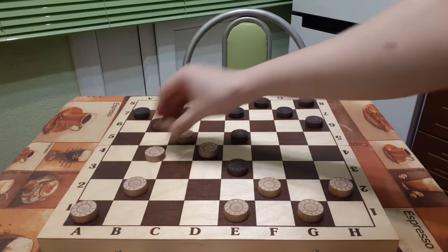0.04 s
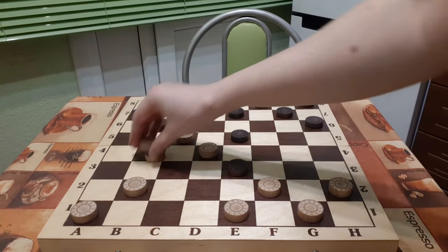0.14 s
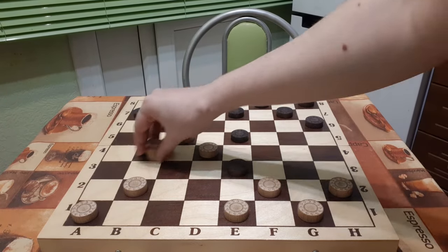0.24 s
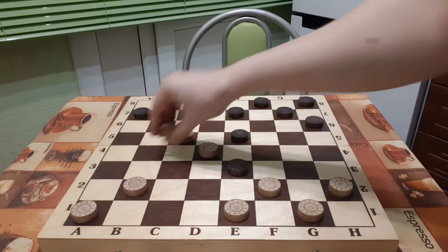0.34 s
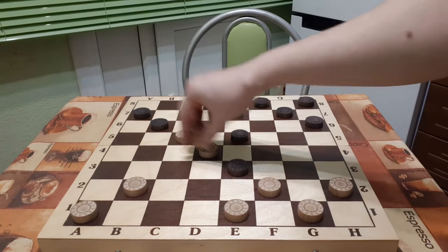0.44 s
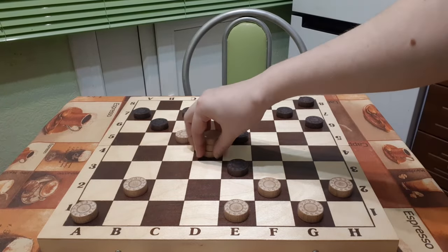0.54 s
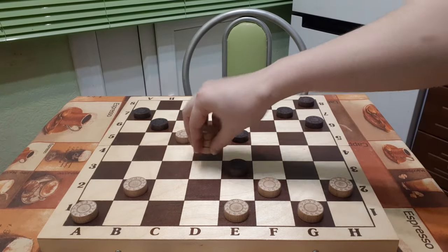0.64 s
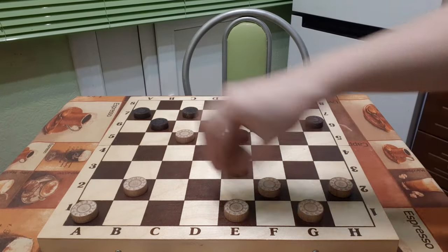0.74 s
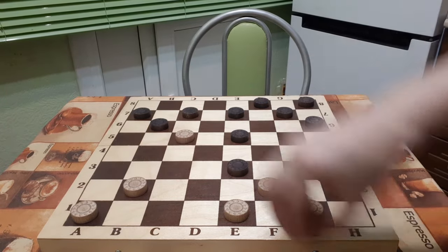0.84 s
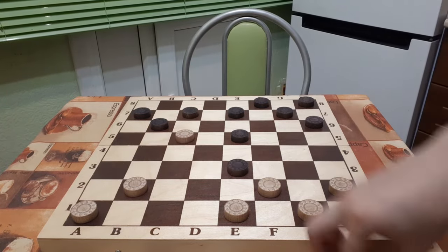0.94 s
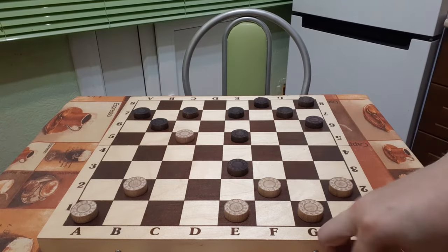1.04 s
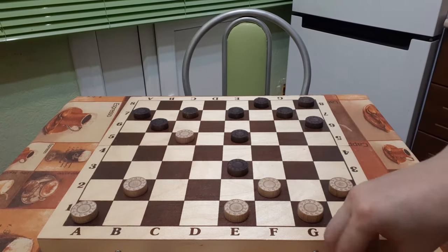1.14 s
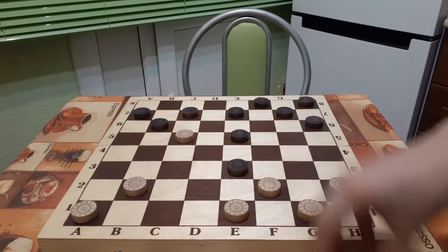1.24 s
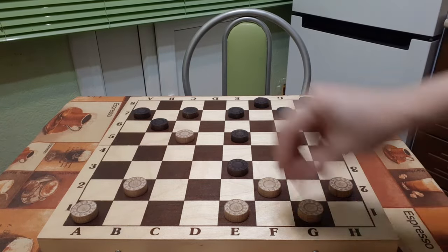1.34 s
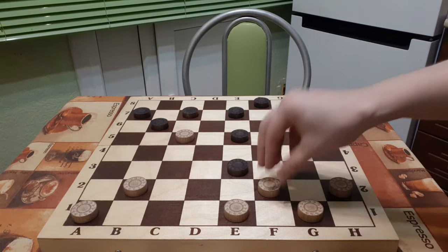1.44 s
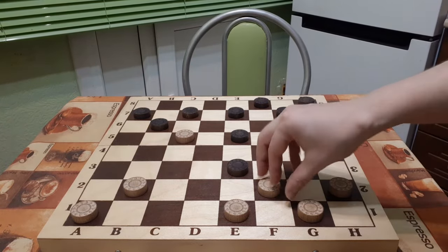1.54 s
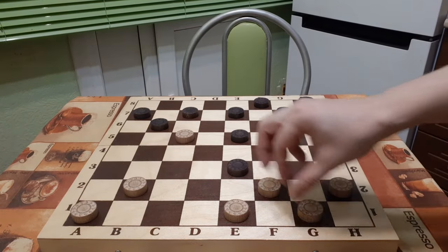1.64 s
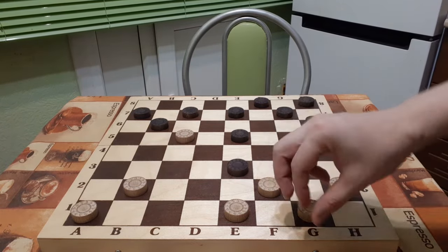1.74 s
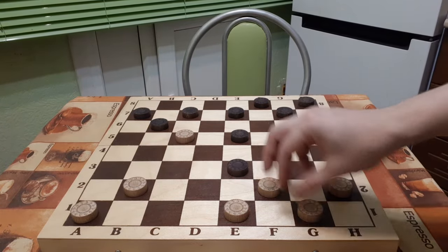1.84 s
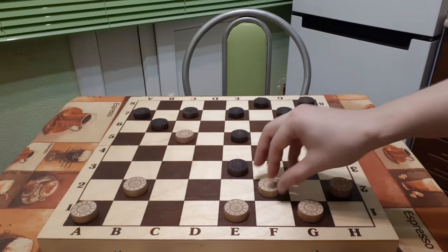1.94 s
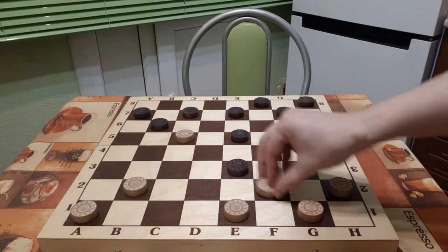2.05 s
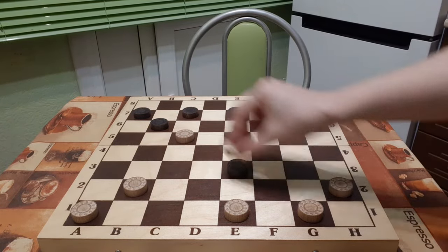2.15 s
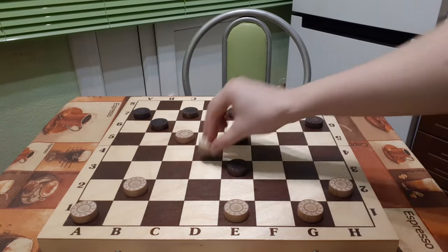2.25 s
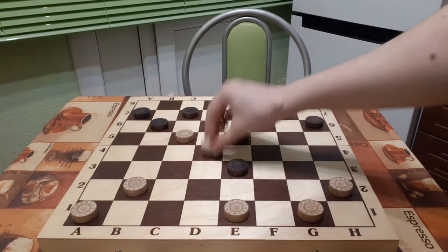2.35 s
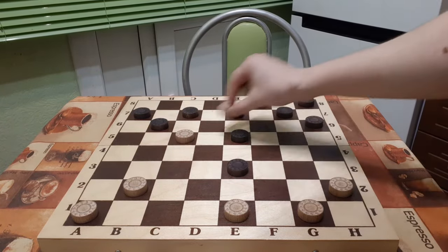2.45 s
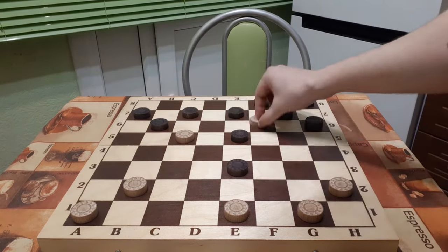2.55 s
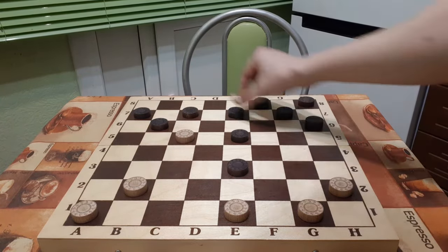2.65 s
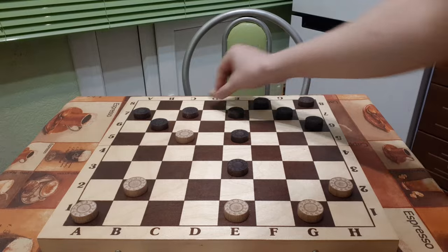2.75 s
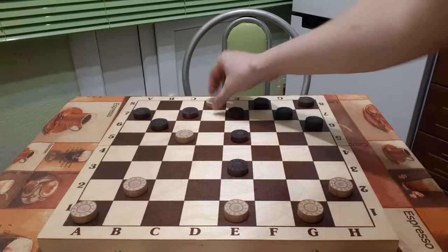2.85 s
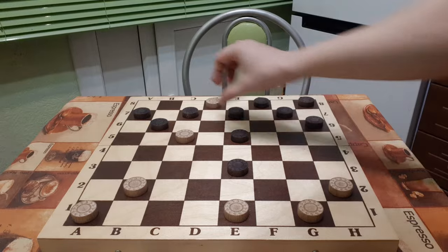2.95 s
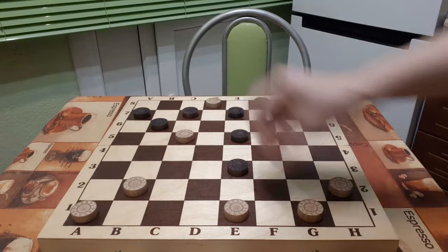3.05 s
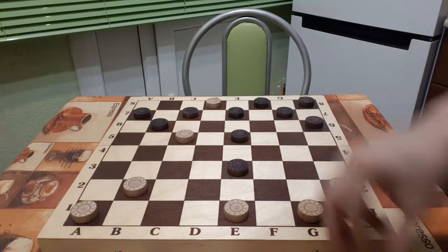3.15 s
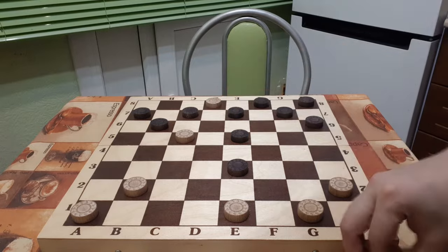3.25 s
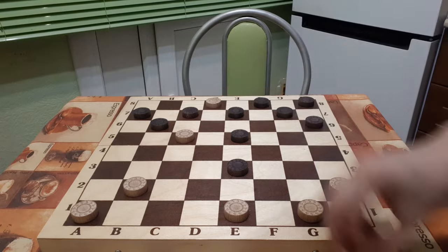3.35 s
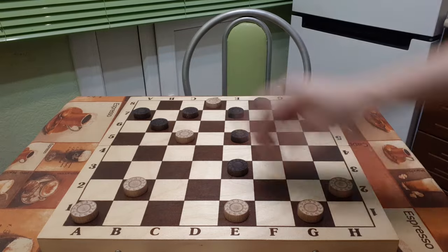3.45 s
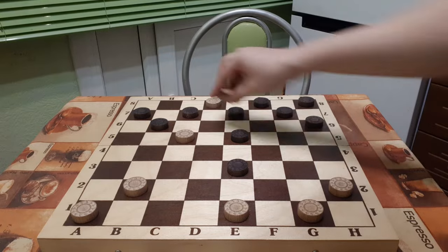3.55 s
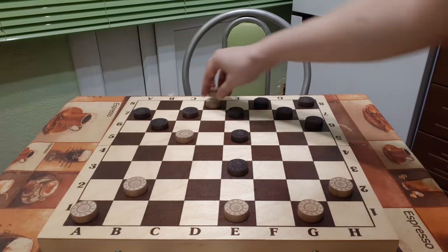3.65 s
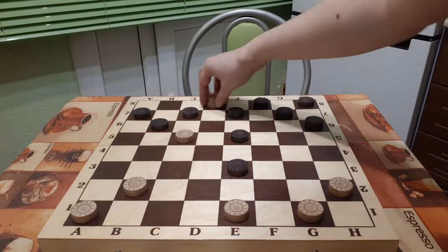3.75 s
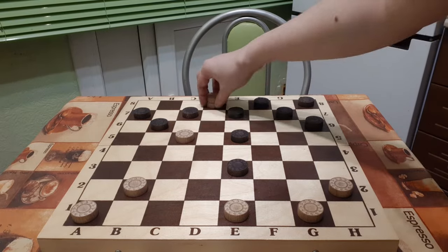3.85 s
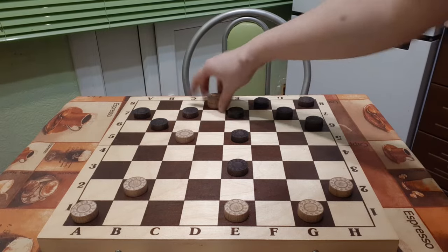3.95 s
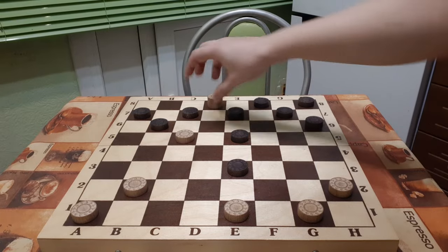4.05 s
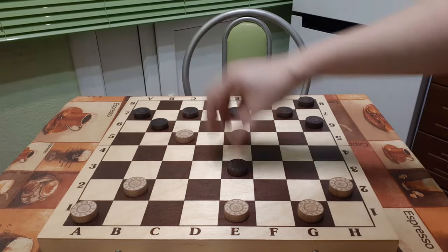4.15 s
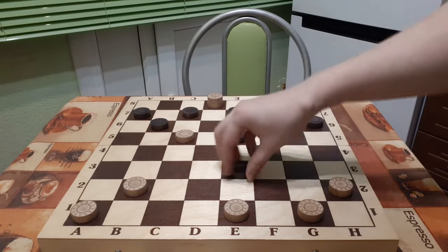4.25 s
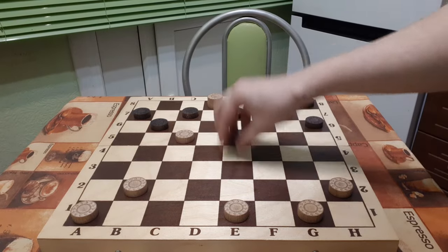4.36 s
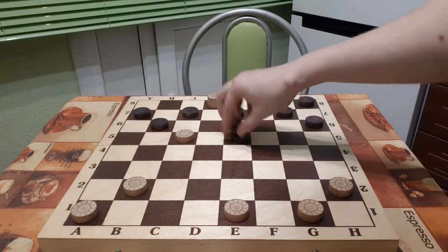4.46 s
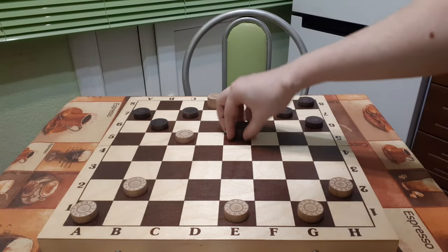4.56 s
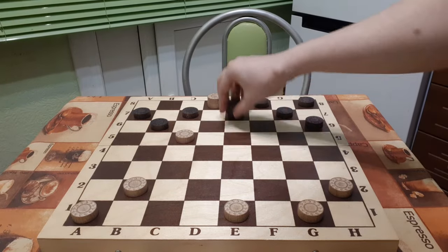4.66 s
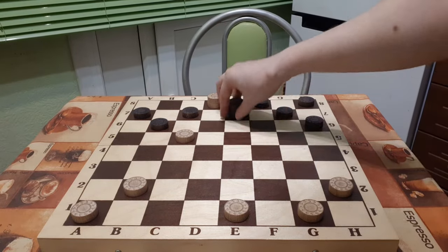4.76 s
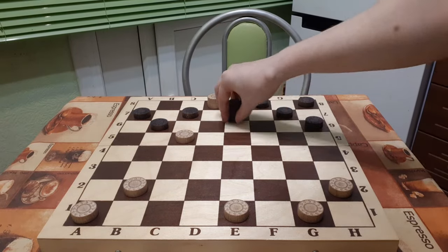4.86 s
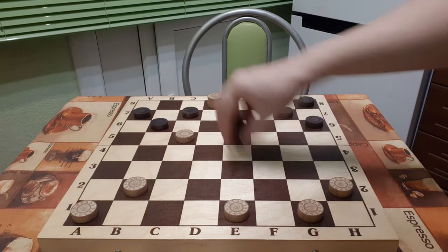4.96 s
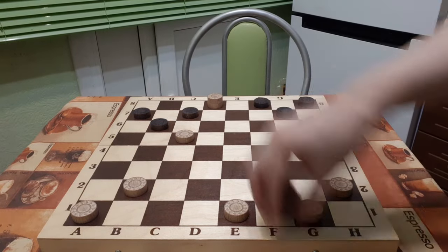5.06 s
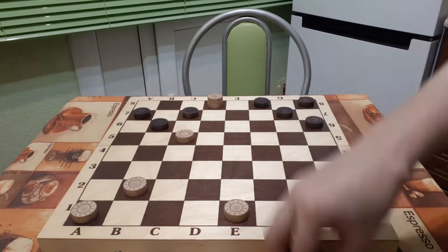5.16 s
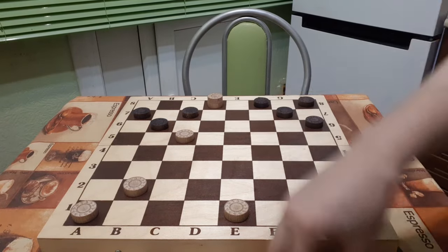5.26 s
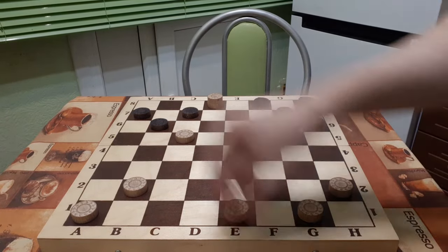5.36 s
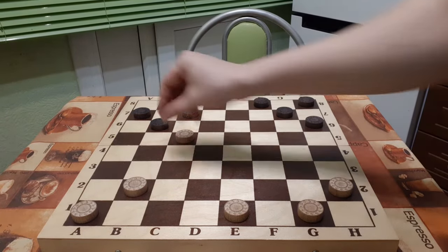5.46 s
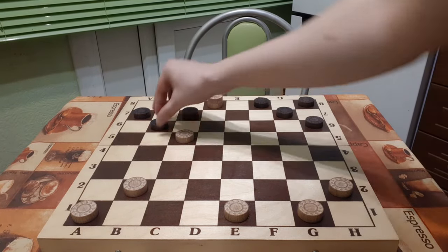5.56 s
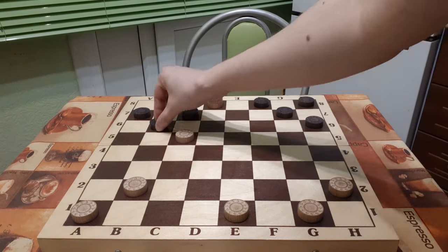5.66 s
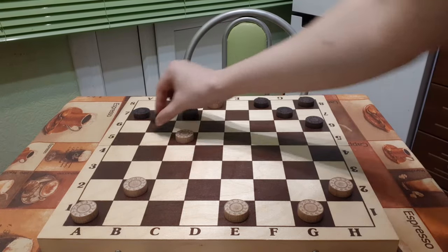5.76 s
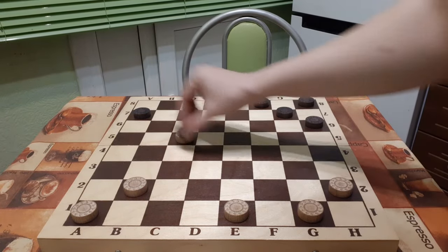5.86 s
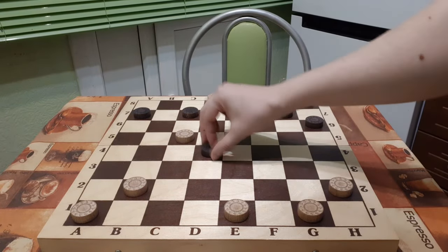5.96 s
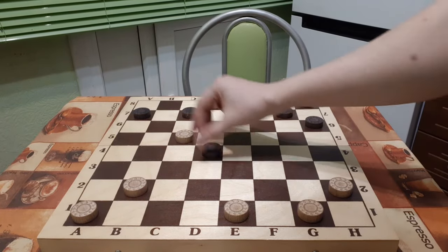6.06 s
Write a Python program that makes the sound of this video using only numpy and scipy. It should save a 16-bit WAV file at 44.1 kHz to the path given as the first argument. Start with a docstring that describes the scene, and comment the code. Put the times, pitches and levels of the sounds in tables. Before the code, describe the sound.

Wooden checkers pieces are played fast on a hollow wooden board, heard close from the table's edge in a small kitchen. Each lands with a sharp clack, a low thump and a short ring off the walls. A soft placement at 0.2 seconds is followed by a firmer clack and a bump at 0.5. Captured pieces click lightly together in a hand just after 1 second. A duller knock at 2 seconds starts a run of three loud clacks, at about 2.3, 2.5 and 2.8. A faint click comes at 3.3 and a softer placement at 3.7, then finger bumps and brief slides until 4.3. Two strong clacks land at 4.5 and 4.8. Pieces chatter brightly together at 5.3, a quiet placement follows at 5.6, and a last sharp clack at 6 seconds. A very faint fridge hum continues throughout.

```python
"""Draughts pieces played fast on a hollow wooden board in a small kitchen, heard from the table's edge.
Each piece lands rim first, slaps flat and rocks within milliseconds; the board thumps under it and
the hard walls ring on. Captured pieces click together in the hand, fingers bump the board and slide
pieces over the grain. A fridge hums faintly."""
import sys
import numpy as np
from scipy import signal
from scipy.fft import rfft, irfft
from scipy.io import wavfile
from scipy.ndimage import uniform_filter1d

SR = 44100
rng = np.random.default_rng(int(sys.argv[2]) if len(sys.argv) > 2 else 0)


def master_out(mix):
    """Clip the mix to full scale and print it as 16-bit PCM to the path in sys.argv[1]."""
    frames = np.transpose(np.atleast_2d(mix))
    ceiling = np.clip(frames, -1, 1)
    pcm = np.round(ceiling * 32767).astype(np.int16)
    wavfile.write(sys.argv[1], SR, pcm)


N = 269010
EVENT_N = 16384
T = np.arange(EVENT_N) / SR
FREQS = np.arange(EVENT_N // 2 + 1) * SR / EVENT_N

# Pieces set down: (time [s], rim to slap [s], slap to press [s], slap [dB], rim re slap [dB],
# press re slap [dB], brightness [Hz], slap thump [dB], press thump [dB], spot pitch [Hz])
MOVES = [ (0.216, 0.0088, 0.0036, -21, -34.5, -0.5, 2870, -29.5, -35.5, 277),
         (0.4871, 0.0099, .0170, -8, -5.5, -13, 8500, -29, -20, 282),
         (2.015, 0.0082, .0160, -18, -12.5, -11.5, 4350, -12, -22.5, 290),
         (2.2983, .0026, 0.0083, -2, 1, -9, 9200, -14, -12, 215),
         (2.545, 0.0027, .0090, -3, -10.5, 4, 10130, -18, -11.5, 175.8),
         (2.811, 0.0031, 0.0049, -5.5, 2.5, -12.5, 8800, -24.5, -25, 210),
         (3.7388, 0.003, .0175, -15, -4, -1.5, 3700, -35.5, -29.5, 275),
         (4.304, 0.0071, .0160, -33.5, 1.5, -1.5, 4800, -27, -39.5, 280),
         (4.502, .0052, .0170, -5, -7, -5.5, 8900, -23, -15, 266),
         (4.757, .0044, .0200, -3, -5, -9, 6700, -16.5, -13, 285),
         (5.6388, 0.0065, .0085, -28, -9, 4.5, 3500, -18.5, -28, 251),
         (5.9817, .0036, .0075, -3, -6.5, -6, 10100, -24.5, -27.5, 285)]
def moves(rim_thump_db=-3.5, rock_s=.0055, rock_db=-10, rock_thump_db=-12.5):
    """Rim touch, flat slap and press on one square; the piece rocks once after slap and after press."""
    out = np.zeros((2, N))
    for (s, tip_s, press_s, slap_db, rim_db, press_db, bright_hz,
         slap_thump_db, press_thump_db, spot_hz) in MOVES:
        comb = square_comb()
        touch = (s, slap_db + rim_db, slap_thump_db + rim_thump_db)
        slap = (s + tip_s, slap_db, slap_thump_db)
        press = (s + tip_s + press_s, slap_db + press_db, press_thump_db)
        rocks = [(at + rock_s, db + rock_db, thump_db + rock_thump_db)
                 for at, db, thump_db in (slap, press)]
        for at, db, thump_db in [touch, slap, press] + rocks:
            add(out, at, panned(undb(db) * clack(bright_hz, comb), pan_db=-0.67))
            add(out, at, panned(undb(thump_db) * thump(spot_hz), pan_db=2))
    return out


# Wooden disc modes: (frequency [Hz], level [dB], t60 [s])
DISC_MODES = [(1127, -4.5, 0.33), (2270, -3.5, 0.14), (3080, 4.5, 0.083), (3247, -15, .15),
              (3520, 7, 0.041), (4874, 10.5, 0.13), (5071, -4, .12), (5888, -2.5, .12), (6200, -6, 0.17),
              (6750, 8.5, 0.042)]
# Wood-on-wood spectrum: (frequency [Hz], gain [dB])
CLACK_EQ = [(40, -26), (150, -13.5), (300, -26), (480, -10.5), (700, -5), (1300, -5), (2200, -4.5),
            (3300, 1), (4800, 2.5), (6800, 1), (8500, -3.5), (11500, -6), (15500, -2)]
def clack(bright_hz, comb, wood_db=-8, disc_db=-13, room_db=2.5, gain_db=15):
    """Wood on wood: a sharp crack, the plywood's dense short ring and the disc's own modes."""
    disc = unit(ring(DISC_MODES, rng.standard_normal(len(DISC_MODES))))
    direct = crack(t60_s=.009) + undb(wood_db) * burst(t60_s=.05) + undb(disc_db) * disc
    wet = stereo_lag(direct) + undb(room_db) * kitchen()
    return undb(gain_db) * colour(wet, comb * contact(CLACK_EQ, bright_hz))


def square_comb():
    """Each piece on each square has its own uneven comb of wood resonances."""
    grids_hz = np.arange(0, SR, 60), np.arange(0, SR, 280)
    fine, broad = (np.interp(FREQS, hz, rng.standard_normal(len(hz))) for hz in grids_hz)
    return undb(2.4 * fine + 1.2 * broad - .6)


def contact(eq, bright_hz):
    """A softer, longer contact leaves out the treble."""
    return undb(lookup(eq, FREQS)) / np.sqrt(1 + (FREQS / bright_hz) ** 4)


# Modes of the hollow board on its table: (frequency [Hz], level [dB], t60 [s])
BOARD_MODES = [(100, -7.5, 0.083), (138.5, -1.5, 0.21), (197.6, 2, 0.24), (252, -1, 0.21), (267, -5, 0.19),
               (283, 2.5, 0.18), (331.9, -5, 0.23), (398, -8.5, .21), (469, -7.5, .16), (511, -5.5, .13),
               (540, -9, .16), (603, -7, .25), (660, -6.5, .24), (786, -7, .17)]
def thump(spot_hz, spread_oct=0.8, rise_s=0.001, radiate_hz=135, knock_db=-9, room_db=-8, gain_db=16):
    """The board bends; the struck spot favours some modes, and a dull knock dies away first."""
    def favour(hz):
        return 1 / (1 + (np.log2(np.maximum(hz, 1) / spot_hz) / spread_oct) ** 2)
    bending = ring(BOARD_MODES, favour(np.array(BOARD_MODES)[:, 0])) * (1 - np.exp(-T / rise_s))
    # a small plate hardly radiates deep bass
    modes = unit(signal.sosfilt(signal.butter(3, radiate_hz, "high", fs=SR, output="sos"), bending))
    knock = unit(colour(burst(t60_s=.035), favour(FREQS) ** 2))
    room = unit(colour(kitchen(), favour(FREQS) ** 2))
    return undb(gain_db) * (stereo_lag(modes + undb(knock_db) * knock) + undb(room_db) * room)


# Ringing after release: (time [s], frequency [Hz], half width [Hz], level [dB])
FREE_RINGS = [(2.301, 4874, 70.4, -11), (2.558, 520, 130, -9), (2.814, 3080, 130, -9.5),
              (2.815, 6150, 100, -13), (4.509, 712, 105, -11), (4.508, 5380, 70.3, -7),
              (4.762, 5230, 148.2, -11.5), (4.775, 460, 120, -9.5), (5.264, 6100, 800, -10),
              (5.265, 15450, 150, -23)]
def free_rings(gain_db=11):
    """Single resonances of a loose disc or the wood under it, held up by the room."""
    out = np.zeros((2, N))
    for s, hz, half_width_hz, db in FREE_RINGS:
        resonance = 1 / (1 + ((FREQS - hz) / half_width_hz) ** 2)
        add(out, s, undb(db + gain_db) * unit(colour(kitchen(), resonance)))
    return out


# Click runs in the hand: (time [s], clicks [count], gap [s], first click [dB], step per click [dB],
# brightness [Hz], first rim snap [dB], left minus right [dB])
CAPTURES = [ (-0.02, 2, .005, -23.5, -4.5, 4600, -80, 0.5), (1.0175, 3, .0063, -26.5, 0, 6950, -59, 2.5),
            (1.0783, 2, 0.0046, -19, -21, 5700, -58, 0.5), (1.185, 2, 0.0056, -18.5, 2.5, 8000, -52, 0.5),
            (3.2649, 2, .0034, -31.5, 7.5, 4630, -86, 0.5), (5.2495, 2, .0038, -9.5, -12, 9000, -5, 1.5),
            (5.263, 4, 0.0026, -13, 1.5, 12000, -2.5, 0)]
def captures():
    """Captured pieces chatter together in quick runs of clicks and rim snaps."""
    out, comb = np.zeros((2, N)), square_comb()
    for s, count, gap_s, db, step_db, bright_hz, rim_db, pan_db in CAPTURES:
        for k in range(count):
            hit = panned(undb(db) * click(bright_hz, comb), pan_db) + undb(rim_db) * rim_snap()
            add(out, s + k * gap_s, undb(k * step_db) * hit)
    return out


# Disc-on-disc spectrum: (frequency [Hz], gain [dB])
CLICK_EQ = [(60, -8), (400, -13.5), (800, -12), (1400, -11), (2100, -11), (4200, -3), (6500, -4),
            (8500, -13), (11000, -8.5), (15500, -14)]
def click(bright_hz, comb, room_db=-3, gain_db=13):
    """Two loose discs meet with no board under them: short and thin."""
    wet = stereo_lag(crack(t60_s=.0045)) + undb(room_db) * kitchen()
    return undb(gain_db) * colour(wet, comb * contact(CLICK_EQ, bright_hz))


# Rim snap spectrum: (frequency [Hz], gain [dB])
RIM_EQ = [(3000, -39.5), (8000, -5.5), (11000, -17.5), (13500, -2), (15300, 2), (17000, -25)]
def rim_snap(room_db=-7, gain_db=11):
    """Hard rims skid on each other with a very high snap that beams to the left."""
    direct = panned(stereo_lag(burst(t60_s=.009)), pan_db=5)
    return undb(gain_db) * colour(direct + undb(room_db) * kitchen(), undb(lookup(RIM_EQ, FREQS)))


# Knocks on board and table: (time [s], level [dB], spot pitch [Hz])
BUMPS = [(0.181, -42.5, 290), (0.5362, -18.5, 280), (1.013, -40.5, 140.8), (1.186, -46.5, 302),
         (1.528, -52, 200), (2.188, -40.5, 302), (3.267, -38, 163.3), (3.837, -36, 284),
         (3.929, -48.5, 303), (3.962, -40, 309), (4.275, -42, 272), (5.05, -52, 284), (5.251, -35.5, 104)]
def bumps(clack_db=-5.5, bright_hz=1900):
    """Fingers and captured pieces bump the wood: mostly thump, with a little dull clack."""
    out = np.zeros((2, N))
    for s, db, spot_hz in BUMPS:
        add(out, s, undb(db) * (thump(spot_hz) + undb(clack_db) * clack(bright_hz, square_comb())))
    return out


# Pieces pushed by the fingers: (time [s], length [s], level [dB])
SLIDES = [(3.925, 0.035, -48), (3.949, 0.035, -29), (4.267, 0.078, -28.5), (4.304, 0.032, -31)]
def slides(grain_db=4, bright_hz=5500, room_db=2, gain_db=12):
    """A sliding disc catches on the grain in a quick run of tiny slips."""
    out = np.zeros((2, N))
    for s, length_s, db in SLIDES:
        stroke = np.sin(np.pi * np.minimum(T / length_s, 1))
        friction = stroke * rng.standard_normal(EVENT_N)
        slips = unit(friction * undb(grain_db * rng.standard_normal(EVENT_N)))
        room = signal.fftconvolve(slips[None], kitchen(), axes=1)[:, :EVENT_N]
        wet = stereo_lag(slips) + undb(room_db) * room
        add(out, s, undb(db + gain_db) * colour(wet, contact(CLACK_EQ, bright_hz)))
    return out


# Kitchen reverberation: (frequency [Hz], t60 [s])
KITCHEN_T60 = [(150, 0.11), (700, 0.34), (1800, .31), (5500, 0.27), (8500, 0.25), (13000, 0.21),
               (16000, 0.13)]
def kitchen(first_s=0.0005, build_s=0.004, coherent_hz=430):
    """Dense reflections off close walls, new for every spot; the bass reaches both sides alike."""
    mid, side = rfft(rng.standard_normal((2, EVENT_N)))
    coherence = 1 / (1 + (FREQS / coherent_hz) ** 3)
    field = np.sqrt(1 + coherence) * mid + np.sqrt(1 - coherence) * side * np.array([[1], [-1]])
    centres_hz, t60s = np.transpose(KITCHEN_T60)
    bands = (np.interp(FREQS, centres_hz, row) for row in np.eye(len(centres_hz)))
    tail = sum(irfft(field * band) * decay(t60_s) for band, t60_s in zip(bands, t60s))
    return unit(tail * (1 - np.exp(-np.maximum(T - first_s, 0) / build_s)))


# Fridge tones: (frequency [Hz], level [dB])
FRIDGE_TONES = [(102.3, -78.5), (156.1, -73), (199.2, -83), (247.6, -81), (296.1, -77)]
def fridge(waver_db=-4.5, drift_rad=.5):
    """A low hum; each tone wavers in level and phase."""
    t = np.arange(N) / SR
    knots_s = np.linspace(0, t[-1], num=30)
    hum = 0
    for hz, db in FRIDGE_TONES:
        waver, drift = (np.interp(t, knots_s, rng.standard_normal(len(knots_s))) for _ in range(2))
        hum += np.sqrt(2) * undb(db + waver_db * waver) * np.sin(2 * np.pi * hz * t + drift_rad * drift)
    return hum


# Room noise spectrum: (frequency [Hz], gain [dB])
AIR_EQ = [(15, -55.5), (25, -22), (64, -26), (78, -20.5), (96, -6), (123, -9.5), (157, -4.5), (270, -13.5),
          (301, -0.5), (344, -13.5), (695, -23.5), (1160, -33.5), (1740, -36.5), (3080, -41),
          (16000, -38.5)]
def room_air(gain_db=-68.5, wide_hz=1200):
    """The soft rush of the room, wider in the treble."""
    hz = np.fft.rfftfreq(N, 1 / SR)
    mid, side = rfft(rng.standard_normal((2, N))) * undb(lookup(AIR_EQ, hz))
    air = irfft(mid + side * hz / (hz + wide_hz) * np.array([[1], [-1]]), N)
    return undb(gain_db) * air / air.std()


# Recorder's automatic gain, as a preset curve: (time [s], gain [dB])
RECORDER_GAIN = [(0, 0.5), (.4, 0.5), (.8, 4.5), (2.2, 5), (3.1, -2), (3.6, -3.5), (4.2, 3.5), (5.1, 5.5),
                 (6.1, 2)]
def background():
    """The recorder's automatic gain turns the room air and fridge hum down and back up."""
    return (room_air() + fridge()) * undb(np.interp(np.arange(N) / SR, *np.transpose(RECORDER_GAIN)))


def crack(t60_s, tick_db=-12):
    """The instant of contact, then brief dense ringing."""
    return undb(tick_db) * (T == 0) + burst(t60_s)


def burst(t60_s):
    """Countless heavily damped modes: decaying noise with a flattened spectrum."""
    spectrum = rfft(rng.standard_normal(EVENT_N) * decay(t60_s))
    smooth_power = uniform_filter1d(np.abs(spectrum) ** 2, size=900)
    return unit(irfft(spectrum / np.sqrt(smooth_power + 1e-12)))


def ring(modes, drives):
    """Decaying modes that start in phase, each with its own drive."""
    return sum(drive * undb(db) * np.cos(2 * np.pi * hz * T) * decay(t60_s)
               for (hz, db, t60_s), drive in zip(modes, drives))


def decay(t60_s):
    return np.exp(-np.log(1000) * T / t60_s)


def colour(x, gain):
    """Minimum-phase filter with the given gain at FREQS; fades the tail out."""
    cepstrum = irfft(np.log(gain + 1e-9))
    cepstrum[1:EVENT_N // 2] *= 2
    cepstrum[EVENT_N // 2 + 1:] = 0
    fade_out = np.minimum(10 * (1 - T / T[-1]), 1) ** 2
    return irfft(rfft(x) * np.exp(rfft(cepstrum))) * fade_out


def lookup(points, hz):
    """Interpolate a table over log frequency."""
    knots_hz, values = np.transpose(points)
    return np.interp(np.log(np.maximum(hz, 1)), np.log(knots_hz), values)


def stereo_lag(x):
    """Direct sound reaches the right side a few samples late."""
    lag = rng.integers(1, 10)
    return np.array([x, np.pad(x, (lag, 0))[:EVENT_N]])


def panned(x, pan_db):
    return x * undb([[pan_db / 2], [-pan_db / 2]])


def undb(db):
    return 10 ** (np.asarray(db) / 20)


def unit(x):
    """Scale to unit energy."""
    return x / np.sqrt(np.sum(x ** 2, axis=-1, keepdims=True))


def add(track, s, sound):
    """Mix in at time s, which may be negative."""
    start = int(s * SR)
    sound, start = sound[..., max(-start, 0):], max(start, 0)
    n = min(sound.shape[-1], N - start)
    track[..., start:start + n] += sound[..., :n]


def scene():
    """The game over the hum of the kitchen."""
    return background() + moves() + captures() + bumps() + free_rings() + slides()


def record(dry, low_hz=22, top_hz=15700):
    """High-pass, clip at full scale, steep low-pass."""
    thin = signal.sosfilt(signal.butter(1, low_hz, "high", fs=SR, output="sos"), dry)
    return signal.sosfilt(signal.ellip(10, .2, 80, top_hz, fs=SR, output="sos"), np.clip(thin, -1, 1))


dry = scene()
out = record(dry)
master_out(out)
```